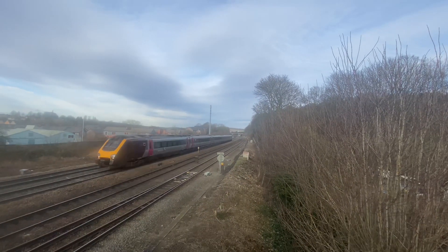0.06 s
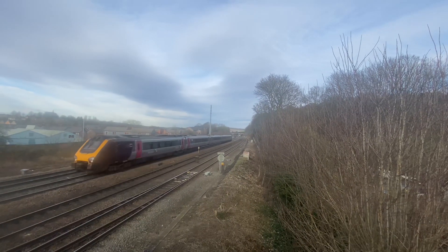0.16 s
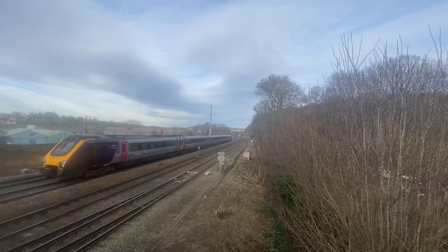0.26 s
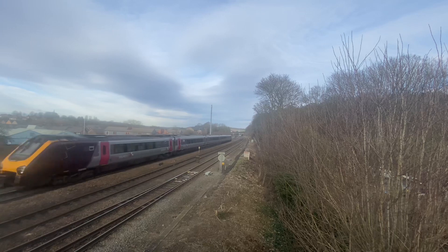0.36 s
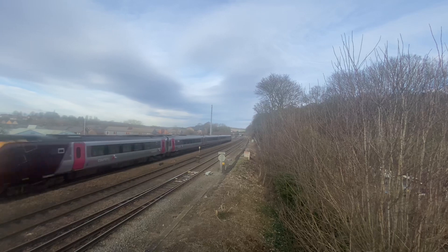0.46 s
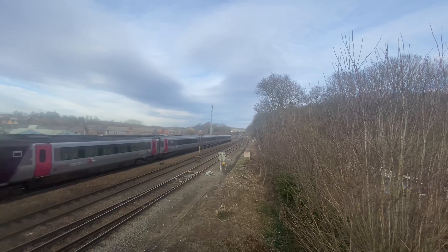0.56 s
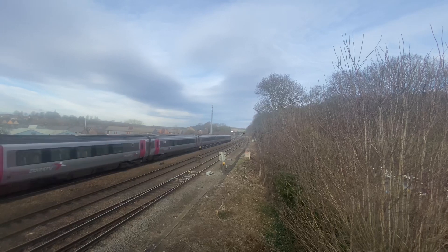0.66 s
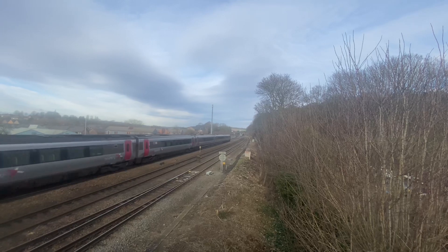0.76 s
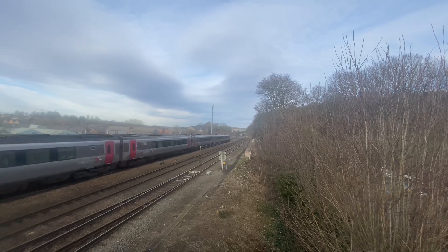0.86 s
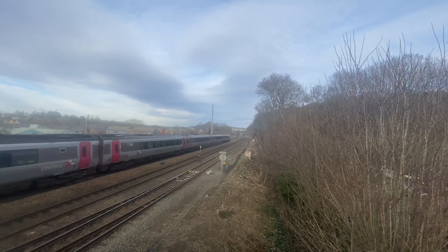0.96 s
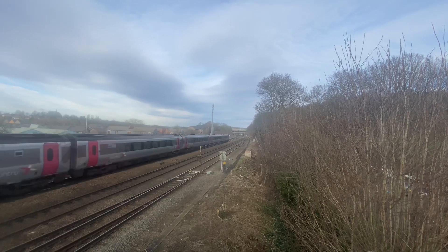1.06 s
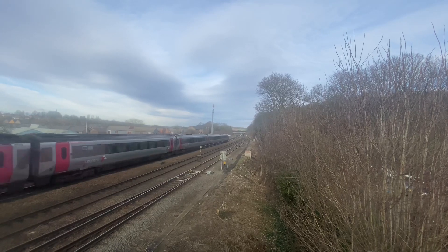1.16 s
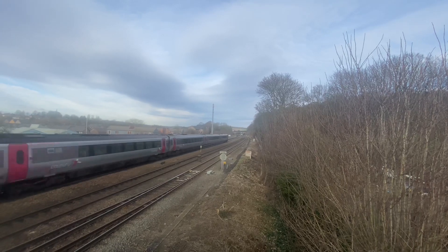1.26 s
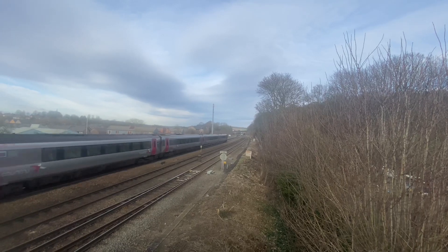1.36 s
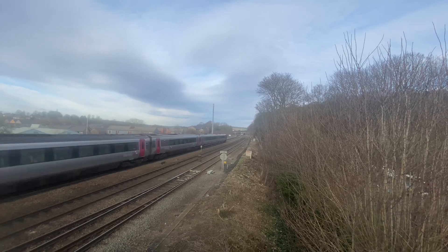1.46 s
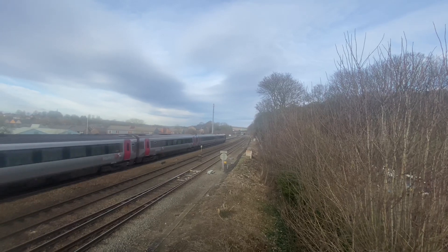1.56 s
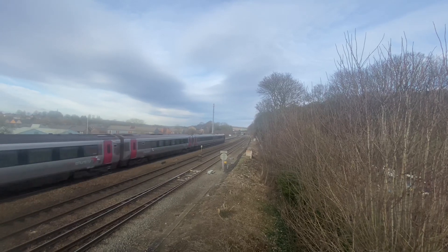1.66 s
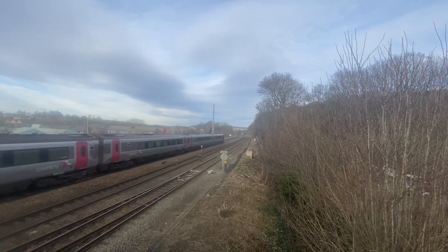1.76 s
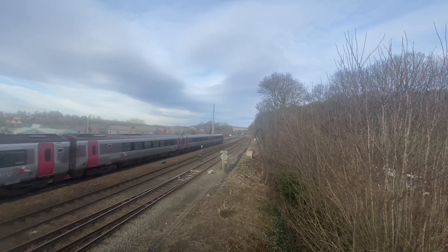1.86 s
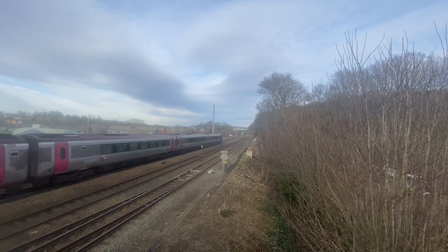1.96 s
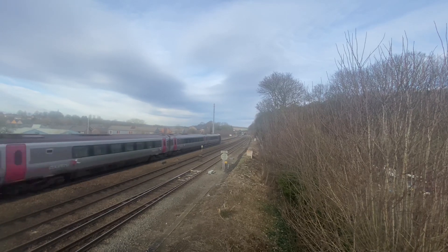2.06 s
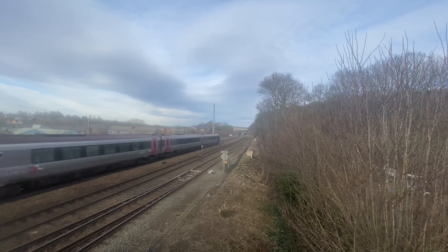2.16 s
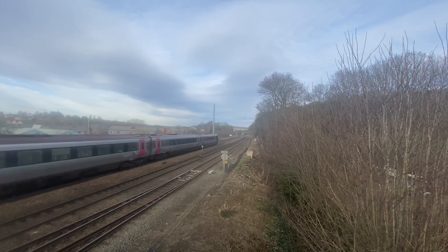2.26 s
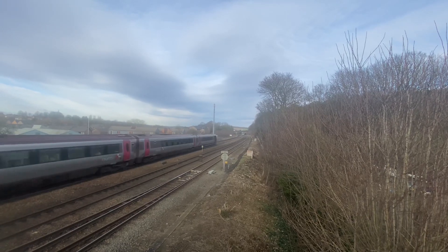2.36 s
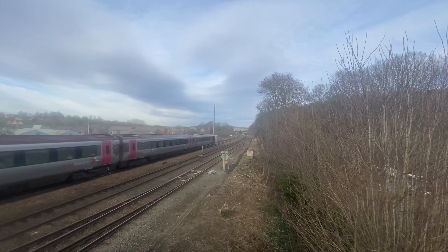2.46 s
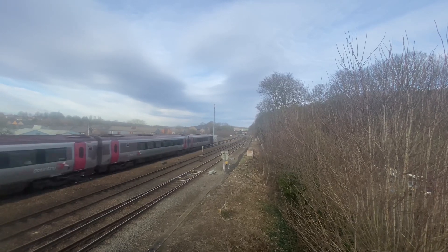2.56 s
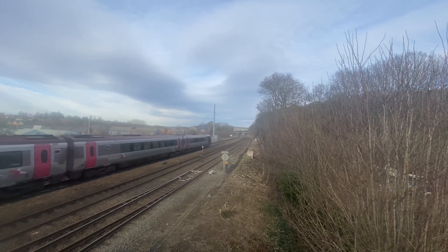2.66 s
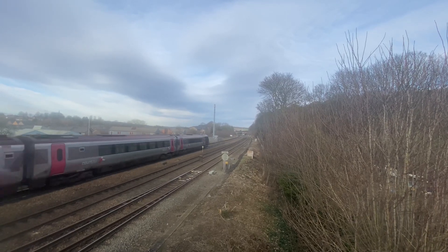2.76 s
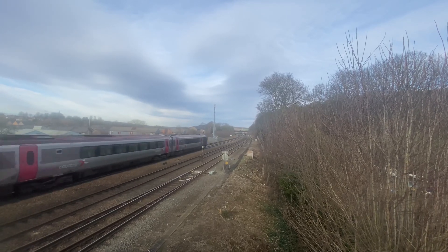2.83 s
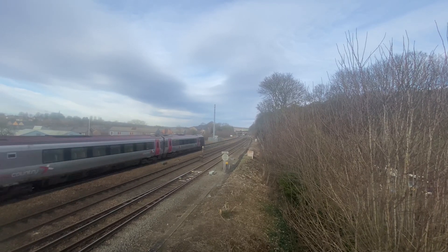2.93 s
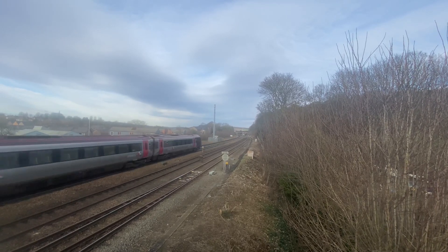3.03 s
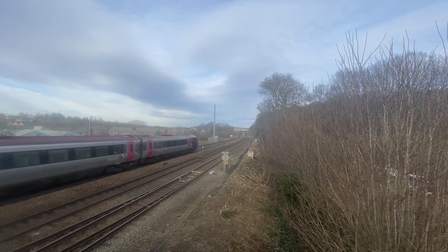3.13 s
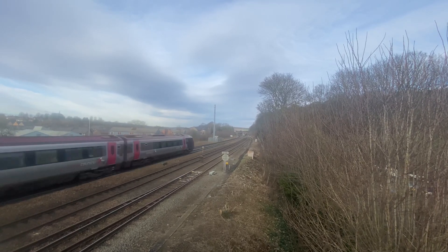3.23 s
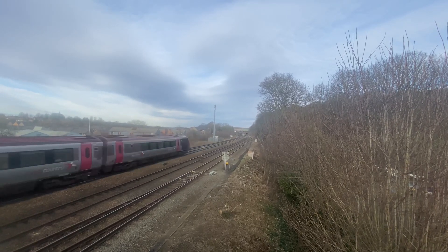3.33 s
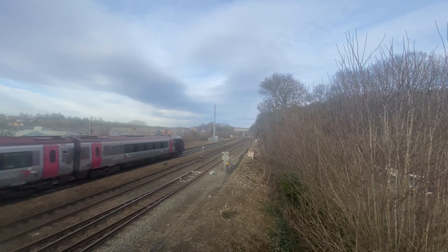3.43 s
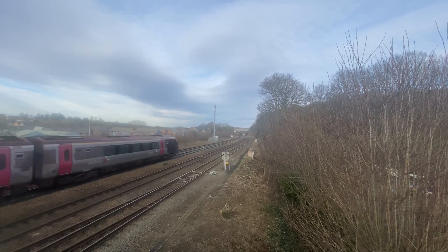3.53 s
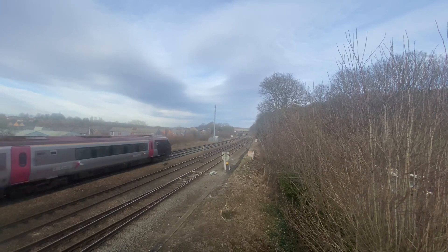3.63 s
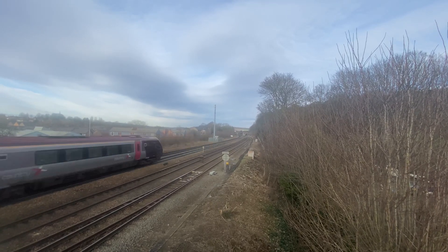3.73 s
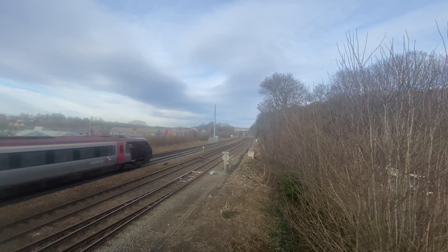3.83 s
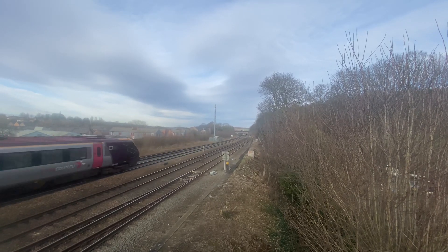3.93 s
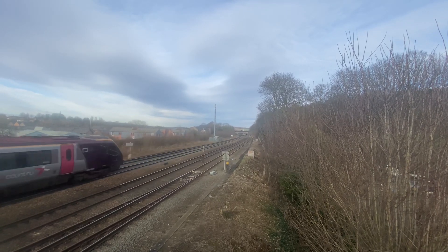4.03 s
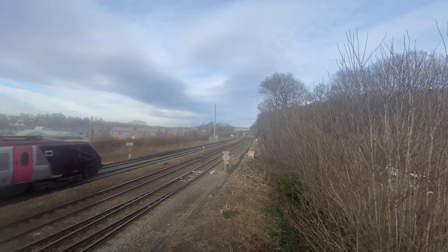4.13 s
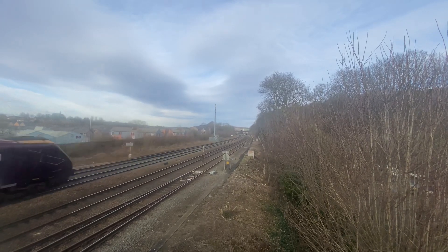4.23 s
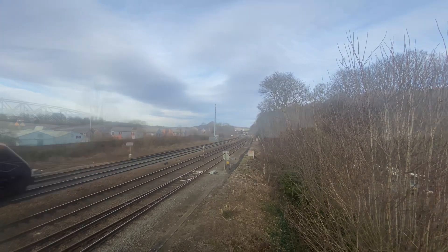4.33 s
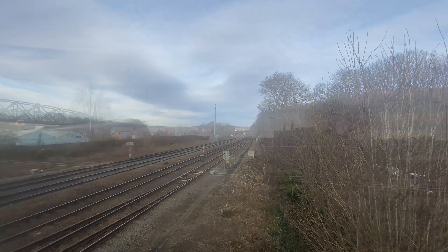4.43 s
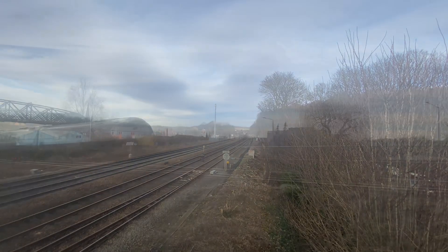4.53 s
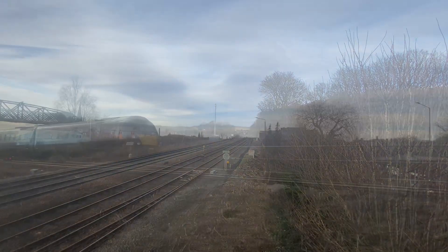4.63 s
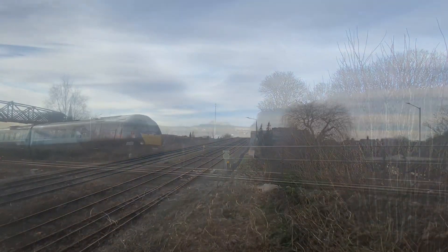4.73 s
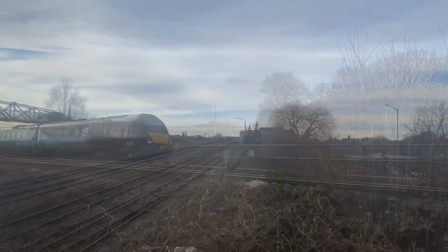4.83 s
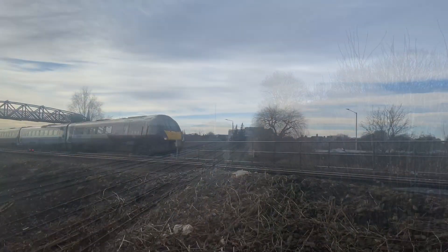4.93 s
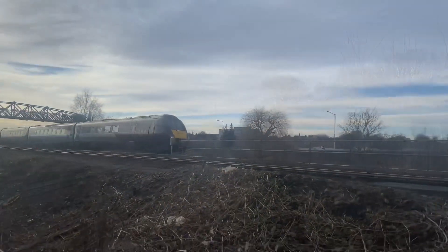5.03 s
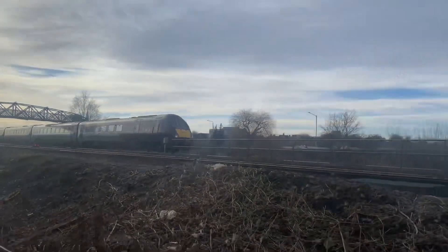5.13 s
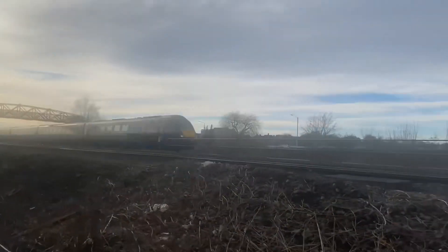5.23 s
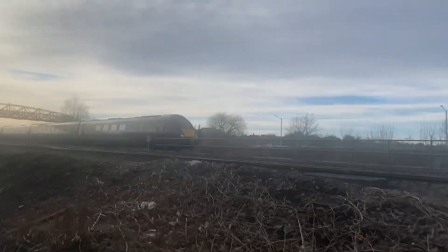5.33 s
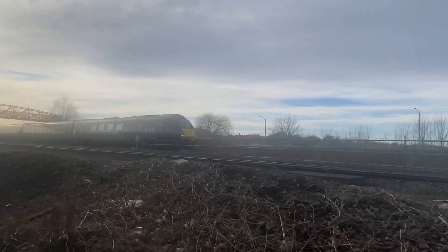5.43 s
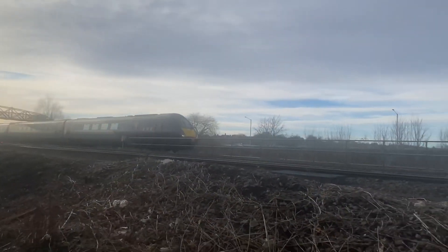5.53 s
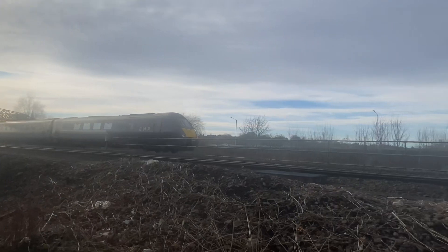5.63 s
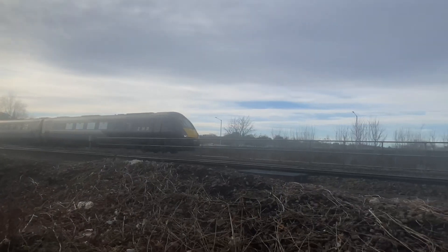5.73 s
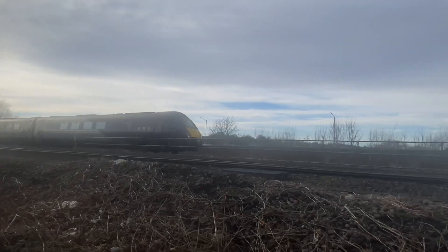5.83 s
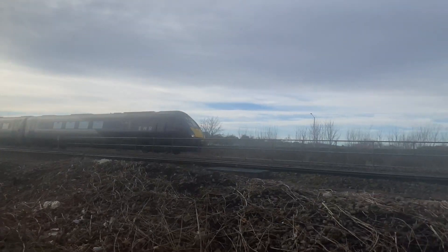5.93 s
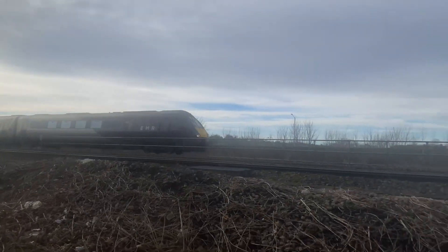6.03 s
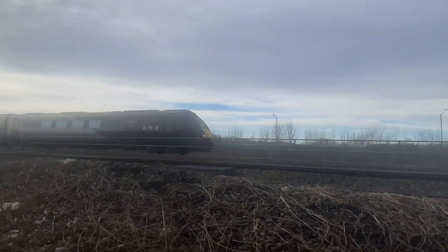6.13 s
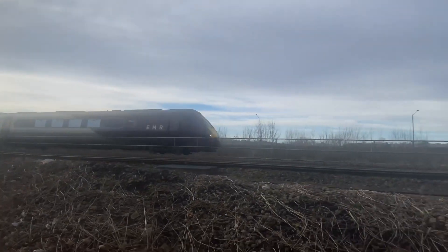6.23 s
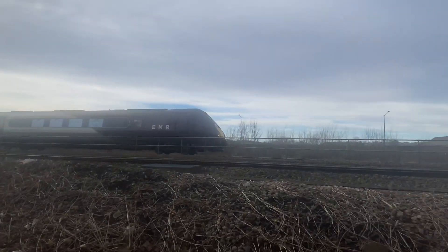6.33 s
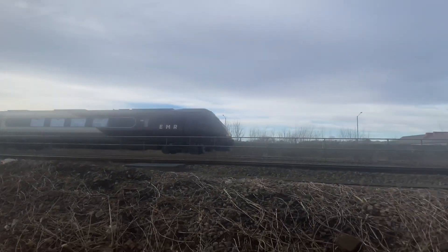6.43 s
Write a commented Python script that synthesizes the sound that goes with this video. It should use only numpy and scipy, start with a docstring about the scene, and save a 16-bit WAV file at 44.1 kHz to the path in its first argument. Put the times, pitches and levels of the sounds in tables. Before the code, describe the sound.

A small handheld stereo microphone at the lineside catches a five-car diesel train already upon it: broad rolling roar, uneven engine boom, ringing rails, short high wheel squeals and airy treble hiss pulsing car by car. After about four seconds the tail passes and the noise drops quickly. A crossfade brings another train, much softer, with a low, nearly steady engine hum and gradually rising roll and hiss.

```python
"""Diesel train pass-by with a second train approaching

Five cars rush past: engine orders slide down by the Doppler effect, and a boom throbs beneath them.
Wheel and rail modes, shaken by rough contact, ring over shaped noise for rolling, bodies and air.
Fluttering hiss gusts as the last car goes by. The scene then dissolves to a second train, whose engines
hum on a nearly steady pitch as its rolling noise grows. Both are heard through a pair of microphone ports.
"""
import sys
import numpy as np
from scipy import signal
from scipy.fft import rfft, irfft, next_fast_len
from scipy.io import wavfile

SR = 44100
rng = np.random.default_rng(int(sys.argv[2]) if len(sys.argv) > 2 else 0)


def pcm_store(signal):
    """Save signal as 16-bit PCM."""
    levels = np.round(np.clip(np.atleast_2d(signal), -1, 1) * 32767)
    wavfile.write(sys.argv[1], SR, levels.astype(np.int16).T)


N = 286209
TIME = np.arange(N) / SR
SPEED_M_PER_S, TRACK_DISTANCE_M, SOUND_SPEED_M_PER_S = 27.5, 13.0, 343.0
NOSE_S, TAIL_S = 0.7, 4.126  # passage of the first train's two ends
FIRST_JOINT_S, CAR_S = 1.049, 0.795  # first coupled car end, and the time one car takes to pass
SHARED_PATCH_DB = 1.5  # patch depth shared by the rail noise and the second train's noises


# One engine per car. Columns: abreast_s, shaft_hz (before Doppler shift), exhaust_loudest_s,
# exhaust_half_length_s, exhaust_db, bark_db (both added to the overtone levels)
CAR_ENGINES = [(1.329, 30.58, 0.74, 0.43, -20, -19.5), (1.722, 30.02, 2.14, 0.41, -24, -28),
               (2.546, 30.3, 2.19, 0.29, -27, -29), (3.388, 30.37, 3.09, 0.77, -26, -30),
               (4.053, 30.5, 3.66, 0.8, -26.5, -26.5)]
# Exhaust overtones. Columns: multiple of shaft speed, relative_db
EXHAUST_OVERTONES = [(1.5, -15.5), (2, -48), (4, -22), (5, -15), (5.5, -19), (6, 0), (6.5, -19), (7, -6.5),
                     (7.5, -14.5), (8, -11.5), (9, -16)]
# Overtones that bark near an engine. Columns: multiple of shaft speed, relative_db, after_abreast_s
BARK_OVERTONES = [(4.5, -10.5, -0.14), (5, 1, -0.21), (5.5, -5, -0.22), (7, -9, -0.061), (8, -13.5, 0.31)]


def engines(flutter=0.18, waver=0.0042, bark_half_s=0.065):
    """Doppler effect: a changing path length slides each engine's swelling exhaust and barks downward."""
    out = np.zeros(N)
    for abreast, shaft_hz, loudest, half_s, exhaust_db, bark_db in CAR_ENGINES:
        distance = np.hypot(SPEED_M_PER_S * (TIME - abreast), TRACK_DISTANCE_M)
        emission_time = TIME - distance / SOUND_SPEED_M_PER_S
        wandering = np.cumsum(waver * drift(6.9)) / SR
        turns = shaft_hz * (emission_time + wandering) + rng.random()
        approach_gain = amp(exhaust_db) / (1 + ((TIME - loudest) / half_s) ** 2)
        out += approach_gain * exhaust(turns, EXHAUST_OVERTONES, flutter, scatter=0.14)
        for multiple, db, after in BARK_OVERTONES:
            bark = exhaust(turns, [(multiple, db)], flutter, scatter=0.19)
            out += amp(bark_db) * swell(abreast + after, bark_half_s) * bark
    return out


# Pitch of the merged engine notes. Columns: time_s, pitch_hz (before waver)
BOOM_PITCH = [(0, 97.5), (0.85, 97.5), (1.35, 92), (1.6, 87), (1.9, 86.5), (2.2, 93.5), (2.48, 86.5),
              (2.65, 93), (3.2, 89), (3.45, 95), (3.9, 85.5), (4.4, 86.5), (5.0, 85.5)]
# Its level. Columns: time_s, level_db (before trim and flutter)
BOOM_LEVEL = [(0, -24), (0.2, -22), (0.45, -21.5), (0.61, -17), (0.7, -16), (0.8, -16), (0.97, -30.5),
              (1.1, -20), (1.17, -21), (1.22, -29), (1.34, -16), (1.46, -25.5), (1.62, -17), (1.67, -29),
              (1.71, -18.5), (1.75, -28), (1.8, -18.5), (1.92, -20.5), (2.03, -22), (2.06, -30),
              (2.1, -16.5), (2.33, -26.5), (2.39, -40), (2.5, -23), (2.56, -35), (2.62, -16.5), (2.77, -23),
              (2.8, -28), (2.85, -17.5), (2.9, -26), (2.94, -17.5), (3.08, -32), (3.15, -19), (3.27, -27),
              (3.33, -21), (3.4, -36), (3.45, -14), (3.52, -28), (3.66, -21), (3.92, -19.5), (3.96, -33),
              (4.02, -19.5), (4.08, -36), (4.15, -17), (4.32, -22), (4.37, -18.5), (4.5, -28.5), (5.0, -40)]


def boom(waver=0.0081, flutter=0.18, trim_db=-0.43):
    """Amplitude modulation: the engines' firing notes merge into one throbbing tone of moving pitch."""
    turns = np.cumsum(curve(BOOM_PITCH) * (1 + waver * drift(4))) / SR
    return amp(curve(BOOM_LEVEL) + trim_db) * (1 + flutter * drift(24)) * tone(turns)


# Short low throbs. Columns: peak_s, half_length_s, pitch_hz, level_db
LOW_THROBS = [(0.38, 0.046, 215, -23), (0.703, 0.11, 197, -18), (0.87, 0.033, 208, -14.5),
              (1.01, 0.03, 165, -20), (1.184, 0.038, 187.6, -17.5), (1.32, 0.026, 175, -23),
              (1.467, 0.036, 218, -15), (1.58, 0.025, 175, -19), (1.84, 0.054, 190, -20),
              (2.516, 0.025, 220, -22), (2.85, 0.072, 190, -24), (3.407, 0.028, 215, -21),
              (3.74, 0.093, 171, -20), (4.184, 0.033, 175, -23.5)]


def throbs(width_hz=17):
    """Narrow-band noise: each short low throb is a rough swell on its own pitch."""
    return sum(amp(db) * swell(s, half_s) * sing(hz, width_hz) for s, half_s, hz, db in LOW_THROBS)


# Howl swells around each car joint. Columns: after_joint_s, half_length_s, relative_db
HOWL_SWELLS = [(-0.28, 0.096, -28.5), (0.0, 0.073, -24), (0.219, 0.04, -29)]


def howl(pitch_hz=410.5, width_hz=7.3, steady_db=-41, wander=0.00362):
    """Modal resonance with soft limiting: the lowest wheel mode howls and swells at each car joint."""
    joints = FIRST_JOINT_S + CAR_S * np.arange(6)
    swells = sum(amp(db) * swell(joint + after, half_s)
                 for joint in joints for after, half_s, db in HOWL_SWELLS)
    mode = ring(pitch_hz * (1 + wander * drift(1.73)), width_hz)
    limited = unit((mode / (abs(mode) + 0.084)).real)
    train_gain = passing(db=0.0, rise_db_per_s=5.0, sag_db_per_s=-0.87, fall_db_per_s=29, full_s=1.1)
    return (swells + amp(steady_db)) * train_gain * limited


# Upper wheel-disc modes. Columns: pitch_hz (before slide), width_hz, relative_db
UPPER_WHEEL_MODES = [(800, 43, -7.5), (1141, 25, -18), (2297, 25, -22), (2468, 23, -15.5)]


def bogies(first_s, slide=0.024):
    """Modal ringing in motion: one bogie of every car swells, slides down in pitch and fades."""
    progress = ((TIME - first_s) / CAR_S) % 1
    doppler = 1 + slide * np.cos(np.pi * progress)
    modes = sum(amp(db) * unit(ring(hz * doppler, width_hz).real)
                for hz, width_hz, db in UPPER_WHEEL_MODES)
    return np.sin(np.pi * progress) * modes


def wheels(first_bogie_s=0.33, bogie_gap_s=0.385):
    """Roughness excitation: uneven contact keeps the howl and the upper wheel modes ringing."""
    upper = bogies(first_bogie_s) + bogies(first_bogie_s + bogie_gap_s)
    gain = passing(db=-25.5, rise_db_per_s=13.0, sag_db_per_s=0.5, fall_db_per_s=29, full_s=0.77)
    return howl() + gain * each_car(depth_db=0.8) * upper


# Wheel modes that sing throughout, two of them a close pair.
# Columns: pitch_hz (before slide and waver), width_hz, relative_db
SINGING_WHEEL_MODES = [(797, 18, -37.5), (1214, 18, -44), (2004, 11, -35.5), (2075, 8.4, -37.5)]


def strands(waver=0.00608, slide=0.00595, flare_db=2.5):
    """Independent modulation: wheel modes flare and waver apart, sinking a little with each car."""
    doppler = 1 - slide * signal.sawtooth(2 * np.pi * (TIME - FIRST_JOINT_S) / CAR_S)
    modes = np.zeros(N)
    for hz, width_hz, db in SINGING_WHEEL_MODES:
        flare = amp(db + flare_db * drift(5.5))
        moving_hz = hz * (doppler + waver * drift(6.2))
        modes += flare * sing(moving_hz, width_hz, evenness=0.48)
    return passing(db=-1.7, rise_db_per_s=3, sag_db_per_s=0.5, fall_db_per_s=26, full_s=1.36) * modes


# Steady rail modes. Columns: pitch_hz, width_hz, relative_db
RAIL_MODES = [(1797, 160, -32.5), (4090, 60, -49), (4380, 110, -46), (4500, 50, -46), (4750, 90, -43.5),
              (4940, 52, -40), (5100, 61, -45), (5780, 190, -46)]


def rail_ring(loudest_s=0.8, half_s=0.5, held_db=-7):
    """Modal ringing: rail modes peak around the nose and carry on more softly under the cars."""
    held = passing(db=held_db, rise_db_per_s=12, sag_db_per_s=0.5, fall_db_per_s=35)
    modes = sum(amp(db) * unit(ring(hz, width_hz).real) for hz, width_hz, db in RAIL_MODES)
    return np.maximum(swell(loudest_s, half_s), held) * modes


def whine(hz=2910, width_hz=22, slide=0.0109, first_s=1.38, db=-40, loudest_s=2.8, half_s=1.9):
    """Narrow-band resonance: a thin wheel whine swells and sinks in pitch with each car."""
    doppler = 1 - slide * signal.sawtooth(2 * np.pi * (TIME - first_s) / CAR_S)
    gain = amp(db) * swell(loudest_s, half_s) * each_car(depth_db=1.0) * behind(fall_db_per_s=51)
    return gain * unit(ring(hz * doppler, width_hz).real)


# Single wheels singing out. Columns: start_s, length_s, first_hz, last_hz, width_hz, level_db
WHEEL_SQUEALS = [(0.149, 0.49, 3730, 3580, 48, -37.5), (0.415, 0.14, 2045, 2037, 14, -30.5),
                 (0.431, 0.27, 5000, 4630, 64, -36), (0.563, 0.27, 3550, 3440, 30, -34),
                 (0.707, 0.26, 2510, 2730, 35, -38), (0.896, 0.14, 2850, 2860, 28, -34),
                 (1.06, 0.13, 2870, 2810, 18, -41), (1.13, 0.25, 2016, 1980, 18, -33),
                 (1.155, 0.18, 2860, 2760, 22, -38), (1.188, 0.13, 2780, 2660, 25, -36),
                 (1.45, 0.3, 6000, 5800, 170, -36), (1.756, 0.35, 3760, 3690, 48, -39.5),
                 (1.716, 0.39, 2870, 2875, 14, -31.5), (1.981, 0.24, 2035, 2000, 31, -30),
                 (2.0, 0.47, 3610, 3600, 39, -36.5), (2.201, 0.36, 2860, 2935, 20, -37.5),
                 (2.485, 0.4, 2826, 2930, 14, -33), (2.845, 0.42, 2954, 2950, 17, -36),
                 (3.349, 0.45, 2840, 2880, 75, -32.5), (3.435, 0.15, 2095, 2075, 16, -31),
                 (3.448, 0.84, 3760, 3450, 320, -34), (3.585, 0.17, 2030, 2020, 21, -29.5),
                 (3.76, 0.24, 2580, 2370, 110, -31), (3.8, 0.21, 2790, 2490, 68, -35),
                 (3.822, 0.11, 2025, 2010, 16, -30), (4.024, 0.33, 2100, 2100, 28, -46),
                 (4.218, 0.31, 2034, 2005, 33, -41), (4.16, 0.3, 2880, 2880, 17, -43),
                 (4.302, 0.2, 3680, 3560, 42, -41)]


def squeals():
    """Frictional squeal: a high wheel mode swells and dies on a gliding, roughened pitch."""
    out = np.zeros(N)
    for start, length, first_hz, last_hz, width_hz, db in WHEEL_SQUEALS:
        progress = np.clip((TIME - start) / length, 0, 1)
        gliding_hz = first_hz + (last_hz - first_hz) * progress
        out += amp(db) * np.sin(np.pi * progress) * sing(gliding_hz, width_hz)
    return out


# Rolling roar spectrum. Columns: frequency_hz, relative_density_db_per_hz
ROLL_SPECTRUM = [(200, -24), (330, 2.5), (480, 0.5), (650, -1), (790, 0), (950, -6), (1150, -4.5),
                 (1400, -10), (1750, -9.5), (2300, -25), (4000, -50)]


def rolling():
    """Rolling noise: rough contact gives a broad, patchy roar that lasts as long as the train."""
    gain = passing(db=-22.0, rise_db_per_s=3.0, sag_db_per_s=0.84, fall_db_per_s=17.0)
    return gain * noise(ROLL_SPECTRUM, patchy_db=1.1)


# Singing-rail spectrum. Columns: frequency_hz, relative_density_db_per_hz
RAIL_SPECTRUM = [(1350, -16), (1620, 3), (1800, 2), (2000, 6), (2220, 1.5), (2450, 1.5), (2750, 1.5),
                 (3100, -4.5), (4000, -42)]


def rail_noise():
    """Rail radiation: a brighter noise band rises and falls once per car."""
    gain = passing(db=-30.0, rise_db_per_s=11, sag_db_per_s=-0.2, fall_db_per_s=37)
    return gain * each_car(depth_db=0.9) * noise(RAIL_SPECTRUM, patchy_db=SHARED_PATCH_DB)


# Level of the drumming car bodies. Columns: time_s, level_db
DRUMMING_LEVEL = [(0.0, -29), (0.35, -24.5), (0.8, -24), (1.1, -21.5), (1.5, -18.5), (1.67, -21),
                  (2.1, -23), (2.45, -23), (2.68, -25.5), (3.1, -23), (3.5, -24.5), (3.85, -21.5),
                  (4.3, -24.5), (4.9, -36.5)]
# Its spectrum. Columns: frequency_hz, relative_density_db_per_hz
RUMBLE_SPECTRUM = [(70, -19), (115, 5.5), (150, 4), (180, 2.5), (225, -1), (270, 4), (330, -22), (400, -10),
                   (550, -50)]


def drumming():
    """Panel radiation: the drumming car bodies are low noise with a changing level."""
    return amp(curve(DRUMMING_LEVEL)) * noise(RUMBLE_SPECTRUM, patchy_db=1.0, size=2048)


# Pushed-air spectrum. Columns: frequency_hz, relative_density_db_per_hz
BUFFET_SPECTRUM = [(10, -62), (25, -44), (33, -16), (42, -8), (51, 0), (66, 6), (110, 3), (150, -8),
                   (250, -59)]


def buffet():
    """Displacement flow: air pushed by the train is heard as very low noise."""
    gain = passing(db=-30.5, rise_db_per_s=6.5, sag_db_per_s=0.0, fall_db_per_s=16)
    return gain * noise(BUFFET_SPECTRUM, patchy_db=-1.0, size=4096)


# Hiss spectrum. Columns: frequency_hz, relative_density_db_per_hz
AIR_SPECTRUM = [(1200, 1.5), (3000, 0), (3650, 4.5), (4050, 1.5), (4600, -1), (5150, 1.5), (5750, 1),
                (6200, -0.5), (7900, -4), (10000, -6.5), (12000, -19), (14000, -72), (17000, -42)]


def air_hiss():
    """Spectral shaping: a patchy treble hiss builds, holds and dies with the train."""
    gain = passing(db=-28.0, rise_db_per_s=10.5, sag_db_per_s=0.3, fall_db_per_s=16.5)
    return gain * noise(AIR_SPECTRUM, patchy_db=1.2)


# Fine fizz, once a car. Columns: peak_s, level_db (before trim)
FIZZ_SURGES = [(0.86, -30), (1.6, -32.5), (2.38, -34), (3.1, -25.5), (3.901, -25.5)]
# Its spectrum. Columns: frequency_hz, relative_density_db_per_hz
FIZZ_SPECTRUM = [(6500, -31), (8000, -11), (8400, -1), (8900, -0.5), (9600, -5), (10500, -18), (12500, -41)]


def fizz(surge_half_s=0.12, trim_db=-1.0):
    """Power addition: steady and surging gains combine by their squares on one fine treble noise."""
    surge_power = sum((amp(db + trim_db) * swell(s, surge_half_s)) ** 2 for s, db in FIZZ_SURGES)
    steady = passing(db=-33.0, rise_db_per_s=18, sag_db_per_s=-0.66, fall_db_per_s=18.5, full_s=0.79)
    return np.hypot(steady, np.sqrt(surge_power)) * noise(FIZZ_SPECTRUM, patchy_db=1.85)


# Roar of the leading cars' bogies coming abreast. Columns: time_s, level_db
SURGE_LEVEL = [(0, -35), (0.8, -27.5), (1.1, -23), (1.35, -26), (1.7, -85), (5.0, -76)]
# Its spectrum. Columns: frequency_hz, relative_density_db_per_hz
SURGE_SPECTRUM = [(200, 0), (340, 7), (500, 10), (720, 1.5), (900, 1.5), (1400, -44)]


def bogie_surge(sweep_db=-28, sweep_s=1.15, half_s=0.13, middle_hz=560, octaves_per_s=2.5, width_hz=90):
    """Band-limited noise: the leading bogies roar, with a narrow band sweeping upward through it."""
    roar = amp(curve(SURGE_LEVEL)) * noise(SURGE_SPECTRUM, patchy_db=1.5)
    centre_hz = middle_hz * 2 ** np.clip(octaves_per_s * (TIME - sweep_s), -1, 1)
    sweep = unit(ring(centre_hz, width_hz).real)
    return roar + amp(sweep_db) * swell(sweep_s, half_s) * sweep


# Gust of hiss as the last car goes by. Columns: time_s, level_db (before flutter)
GUST_LEVEL = [(0, -90), (3.0, -64), (3.3, -38), (3.72, -32), (3.81, -26), (3.92, -28), (4.0, -28),
              (4.13, -28), (4.22, -35.5), (4.5, -49), (5.0, -82)]
# Its spectrum. Columns: frequency_hz, relative_density_db_per_hz
GUST_SPECTRUM = [(1500, -31), (2400, 0), (3300, 4.5), (4500, 5.5), (5500, 4), (7000, 3.5), (10500, 1.5),
                 (12200, -4), (13500, -12), (15500, -9.5), (17000, -40)]


def hiss_gust(flutter_db=1.5):
    """Random amplitude modulation: fluttering, patchy hiss gusts as the last car goes by."""
    gain = amp(curve(GUST_LEVEL) + flutter_db * drift(35))
    return gain * noise(GUST_SPECTRUM, patchy_db=2.5)


# Second train's firing pitch. Columns: time_s, pitch_hz (before waver)
HUM_PITCH = [(4.4, 95.5), (5.6, 95), (6.49, 93.5)]
# Firing note. Columns: time_s, level_db (before trim)
HUM_LEVEL = [(4.9, -30.5), (5.1, -41.5), (5.7, -38), (5.85, -31.5), (6.3, -29), (6.49, -31)]
# Octave reference for the overtones. Columns: time_s, level_db
OCTAVE_LEVEL = [(4.7, -34), (5.3, -36.5), (5.5, -29.5), (6.0, -34), (6.2, -29), (6.49, -26.5)]
# Exhaust overtones. Columns: multiple of firing pitch, db_against_octave
HUM_OVERTONES = [(4 / 3, -14), (5 / 3, -8.5), (2, -0.57), (7 / 3, -10.5), (8 / 3, -12.5)]


def second_hum(flutter=0.26, waver=0.0072, trim_db=2.0):
    """Harmonic synthesis: the firing note and exhaust overtones follow one nearly steady pitch."""
    turns = np.cumsum(curve(HUM_PITCH) * (1 + waver * drift(4.7))) / SR
    firing_note = amp(curve(HUM_LEVEL) + trim_db) * tone(turns)
    return firing_note + amp(curve(OCTAVE_LEVEL)) * exhaust(turns, HUM_OVERTONES, flutter)


# Second train's rumble, roll and hiss spectra. Columns: frequency_hz, relative_density_db_per_hz
FAR_RUMBLE_SPECTRUM = [(10, -48), (25, -26), (42, -18), (56, 3), (75, -3), (120, -8), (160, -1.5),
                       (235, -13.5), (300, -9), (400, -28), (700, -71)]
FAR_ROLL_SPECTRUM = [(150, -37), (380, 2), (620, -1.5), (900, -1), (1400, -5.5), (1800, -2.5), (2100, -9),
                     (3000, -8.5), (5000, -56)]
FAR_AIR_SPECTRUM = [(1500, -5), (2800, 4.5), (3900, 4.5), (5500, 0.5), (7000, -3), (8000, -3.5),
                    (8500, 10.5), (9100, 16.5), (9600, -30), (10500, -29), (11500, -42), (13000, -45)]
# Rails singing ahead of the train, together with a high band near 9.5 kHz that opens as it nears. Columns:
# time_s, level_db
SINGING_LEVEL = [(5.0, -75), (5.4, -82), (5.75, -45), (6.1, -42.5), (6.49, -50)]
# Spectrum of that hiss. Columns: frequency_hz, relative_density_db_per_hz
SINGING_SPECTRUM = [(1700, -20), (2050, 1), (2500, -9), (3200, -7), (3800, 11), (4300, 8), (5000, -7),
                    (8500, -20), (9250, 16), (9700, 17), (10300, 3), (11000, -23), (13000, -36)]


def second_rolling():
    """Approach gain: rumble, roll and hiss grow, treble fastest, while the rails sing ahead and a high band
    opens."""
    rumble_gain = approaching(db=-34.0, rise_db_per_s=3.0)
    rumble = rumble_gain * noise(FAR_RUMBLE_SPECTRUM, patchy_db=SHARED_PATCH_DB, size=4096)
    roll = approaching(db=-38.0, rise_db_per_s=3.5) * noise(FAR_ROLL_SPECTRUM, patchy_db=SHARED_PATCH_DB)
    air = approaching(db=-41.5, rise_db_per_s=7.5) * noise(FAR_AIR_SPECTRUM, patchy_db=SHARED_PATCH_DB)
    rails = amp(curve(SINGING_LEVEL)) * noise(SINGING_SPECTRUM, patchy_db=SHARED_PATCH_DB)
    return rumble + roll + air + rails


def exhaust(turns, overtones, flutter, scatter=0.051):
    """Phase-locked harmonics: unequal cylinders puff in a repeating order, so overtones throb together."""
    out = np.zeros(N)
    for multiple, db in overtones:
        gain = amp(db) * (1 + flutter * drift(5.1))
        phase = multiple * turns + scatter * drift(4.4)
        out += gain * np.sqrt(2) * np.cos(2 * np.pi * phase)
    return out


def ring(hz, width_hz):
    """Random modal excitation: narrow complex noise is carried on a moving pitch."""
    r = np.exp(-np.pi * width_hz * np.pi / 2 / SR)  # double-pole radius
    contact = rng.standard_normal(N) + 1j * rng.standard_normal(N)
    shake = signal.lfilter([(1 - r) ** 2], [1, -2 * r, r * r], contact)
    return unit(shake) * np.exp(2j * np.pi * np.cumsum(hz * np.ones(N)) / SR)


def sing(hz, width_hz, evenness=0.9):
    """Amplitude saturation: a hard-driven mode evens out in strength while its pitch still wavers."""
    mode = ring(hz, width_hz)
    return unit((mode / (abs(mode) + evenness)).real)


def tone(turns):
    """Simple harmonic motion: a sine of rms 1 starts anywhere in its cycle."""
    return np.sqrt(2) * np.sin(2 * np.pi * (turns + rng.random()))


def noise(spectrum, patchy_db, size=1024):
    """Short-time synthesis: two unrelated coloured noises share patches in time and frequency."""
    hz = np.fft.rfftfreq(size, 1 / SR)
    frames = 4 * N // size + 5
    real, imag = rng.standard_normal((2, 2, len(hz), frames), dtype=np.float32)
    blur = np.outer(np.hanning(18), np.hanning(18))
    patches = unit(signal.fftconvolve(rng.standard_normal((len(hz), frames)), blur, "same"))
    gain = amp(over_hz(spectrum, hz)[0][:, None] + patchy_db * patches)
    _, pair = signal.istft((real + 1j * imag) * gain, nperseg=size, noverlap=size - size // 4)
    return unit(pair[:, :N])


def drift(rate_hz):
    """Low-pass random process: a slow wander of rms 1."""
    control_rate_hz, points = 400, 4096
    hz = np.fft.rfftfreq(points, 1 / control_rate_hz)
    slow = irfft(rfft(rng.standard_normal(points)) / (1 + (hz / rate_hz) ** 4))
    return unit(np.interp(TIME, np.arange(len(slow)) / control_rate_hz, slow))


def swell(at_s, half_s):
    """Gaussian envelope: a bell-shaped rise and fall of height 1."""
    return np.exp(-((TIME - at_s) / half_s) ** 2 / 2)


def passing(db, rise_db_per_s, sag_db_per_s, fall_db_per_s, full_s=NOSE_S):
    """Extended-source envelope: gain rises to full, drifts while held, and falls behind the tail."""
    early, held = np.maximum(full_s - TIME, 0), np.maximum(TIME - full_s, 0)
    return amp(db - rise_db_per_s * early - sag_db_per_s * held) * behind(fall_db_per_s)


def behind(fall_db_per_s):
    """Exponential decay: gain dies once the tail has gone by."""
    return amp(-fall_db_per_s * np.maximum(TIME - TAIL_S, 0))


def each_car(depth_db, peak_s=1.99):
    """Periodic modulation: gain rises and falls once per car."""
    return amp(depth_db * np.cos(2 * np.pi * (TIME - peak_s) / CAR_S))


def approaching(db, rise_db_per_s, from_s=5.45):
    """Exponential growth: gain of the second train's noises rises as it nears."""
    return amp(db + rise_db_per_s * np.maximum(TIME - from_s, 0))


def amp(db):
    """Logarithmic level: decibels to gain."""
    return 10 ** (np.asarray(db) / 20)


def unit(x):
    """Root-mean-square normalisation: scales to rms 1."""
    return x / np.sqrt(np.mean(np.abs(x) ** 2) + 1e-20)


def curve(rows):
    """Linear interpolation: a time table becomes a value at every sample."""
    seconds, values = np.transpose(rows)
    return np.interp(TIME, seconds, values)


def over_hz(rows, hz):
    """Logarithmic frequency scale: interpolates each column of a frequency table."""
    f, *columns = np.transpose(rows)
    return [np.interp(np.log(hz + 1), np.log(f + 1), column) for column in columns]


def ports(table, tones, noises):
    """Spaced reception: the ports differ in phase and level, and their noises are partly unrelated."""
    size = next_fast_len(N + 2048)
    coherence, lead_rad, balance_db = over_hz(table, np.fft.rfftfreq(size, 1 / SR))
    coherence, tilt = np.clip(coherence, 0, 1), amp(balance_db)
    direct, shared, stray = rfft(np.vstack([tones, noises]), size)
    left = (direct + shared) * tilt
    mixed = direct + coherence * shared + np.sqrt(1 - coherence ** 2) * stray
    right = mixed * np.exp(-1j * lead_rad)
    equal_power = np.sqrt(2 / (1 + tilt ** 2))
    return irfft(np.array([left, right]) * equal_power, size)[:, :N]


# How each train reaches the two ports.
# Columns: frequency_hz, noise_coherence (0-1), left_lead_rad, left_minus_right_db
NEAR_PORTS = [(60, 1, 0.13, 0.5), (213, 0.71, 0.14, -0.4), (300, 0.92, 0.93, -4.5), (338, 0.33, 1.96, 1.3),
              (590, 0.23, 1.84, 6.5), (820, 0.85, 1.95, 6), (1076, 0.7, 2.04, 2), (1350, 0.72, 2.75, 0),
              (1840, 0.81, 3.63, -3), (2080, 0, 4.85, 0), (2440, 0.24, 6.1, 1), (2860, 0.08, 7.07, 5.5),
              (3460, 0.02, 10.06, 4), (4900, 0.06, 14.5, 3), (5850, 0.23, 16.2, 1), (6540, 0.53, 20.3, 1),
              (6970, 0.7, 20, 2), (7800, 0, 20.8, -3), (9210, 0.56, 23.5, -4), (10470, 0.2, 18.3, -0.5)]
FAR_PORTS = [(60, 1, 0.1, 1.5), (250, 0.89, 0.21, -0.5), (430, 0.61, 0.1, 0.5), (694, 0.51, 2.4, 5),
             (900, 0.42, 0.8, 3), (1200, 0.54, 1.3, 0.5), (1810, 0.55, 2.85, 0.5), (2450, 0.37, 8.5, 6.5),
             (2980, 0.51, 9.2, 0), (3640, 0.24, 13.7, 4), (4800, 0.08, 8.7, 1), (5500, 0.32, 9.7, 1),
             (6300, 0.69, 12.4, -3), (7300, 0.34, 13.0, 10), (8540, 0.21, 8.9, -3), (8890, 0.92, 9.4, 0.5)]
# Dissolve between the trains. Entries: start_s, end_s
DISSOLVE = (4.56, 5.08)


def scene():
    """Equal-power crossfade: the passing train dissolves into the approaching one."""
    tones = engines() + boom() + throbs() + wheels() + strands() + rail_ring() + whine() + squeals()
    noises = rolling() + rail_noise() + drumming() + buffet() + air_hiss() + fizz()
    noises = noises + bogie_surge() + hiss_gust()
    first = ports(NEAR_PORTS, tones, noises)
    second = ports(FAR_PORTS, second_hum(), second_rolling())
    blend = np.interp(TIME, DISSOLVE, (0, np.pi / 2))
    return np.cos(blend) * first + np.sin(blend) * second


def record(dry, edge_hz=15700):
    """Linear-phase filtering: a low-pass limits the band of both channels."""
    lowpass = signal.firwin(511, edge_hz, window=("kaiser", 9), fs=SR)
    return signal.oaconvolve(dry, lowpass[None], "same")


dry = scene()
out = record(dry)
pcm_store(out)
```